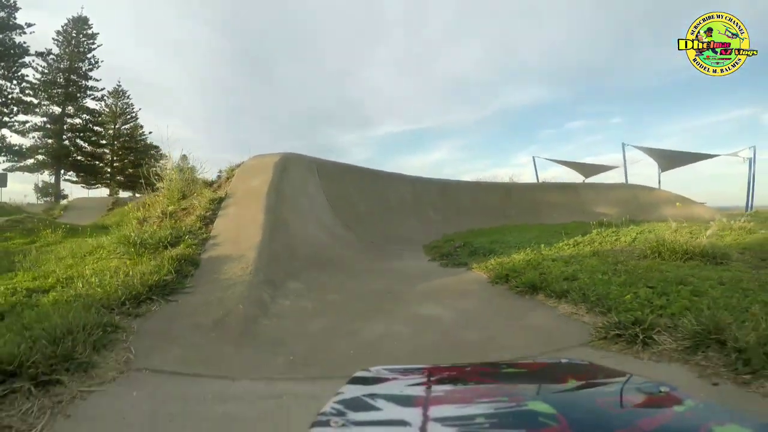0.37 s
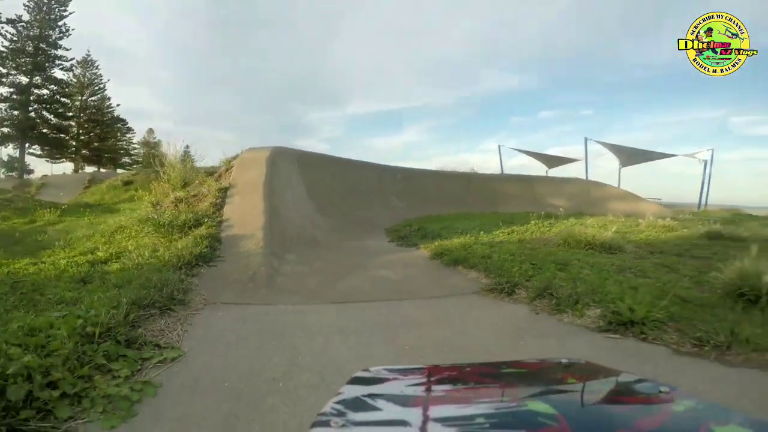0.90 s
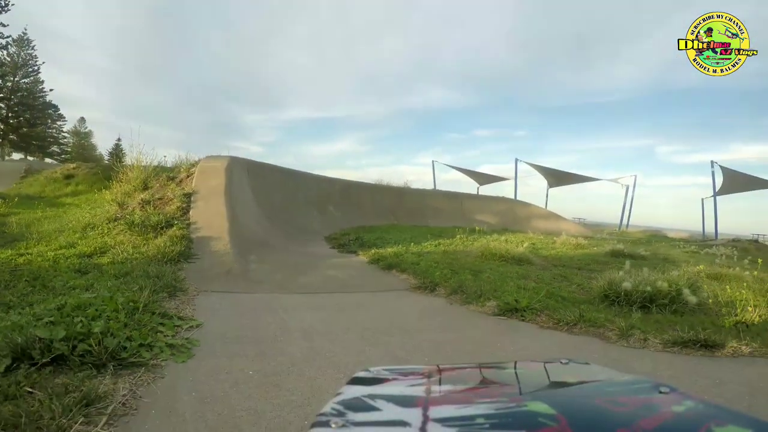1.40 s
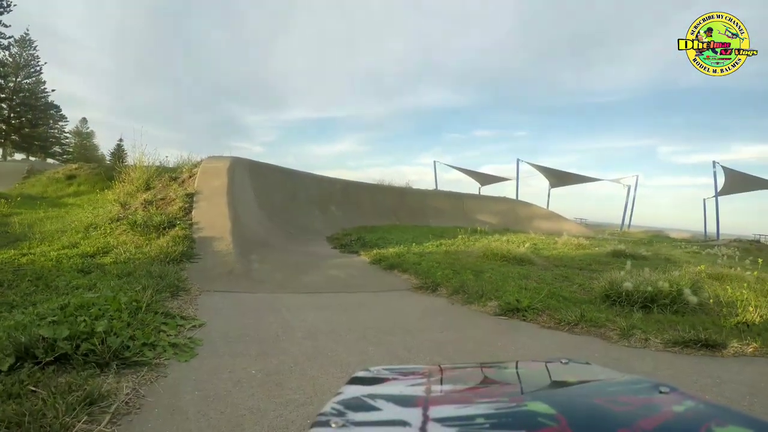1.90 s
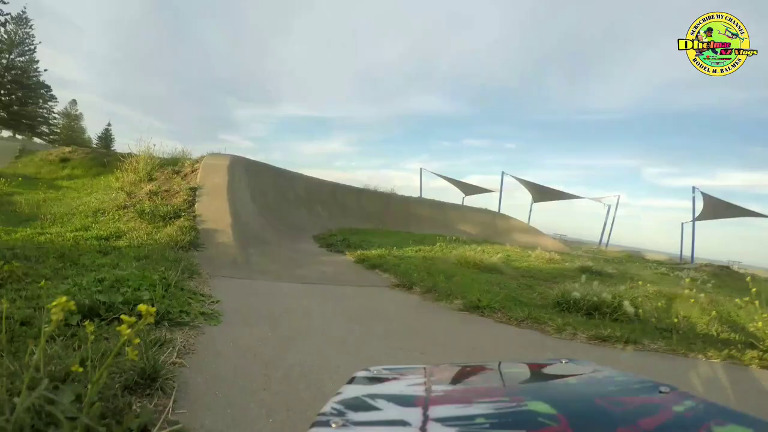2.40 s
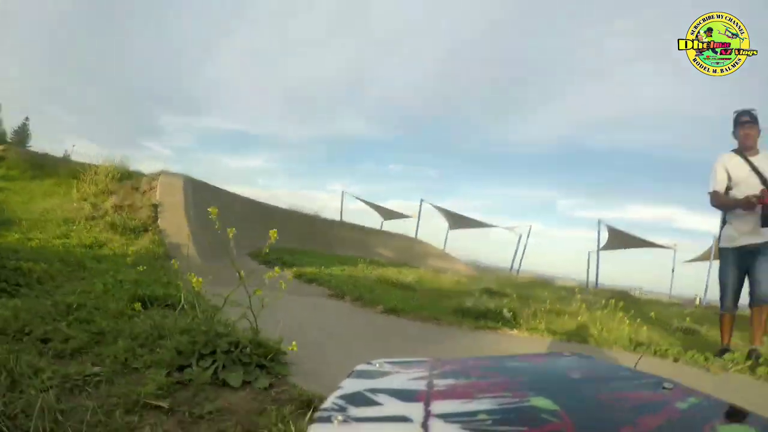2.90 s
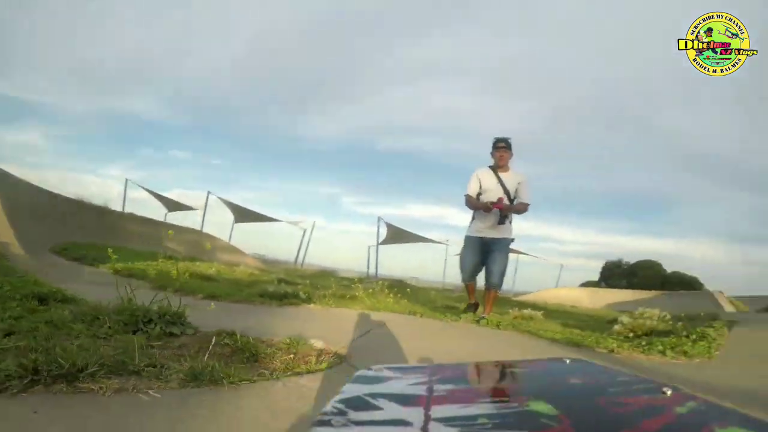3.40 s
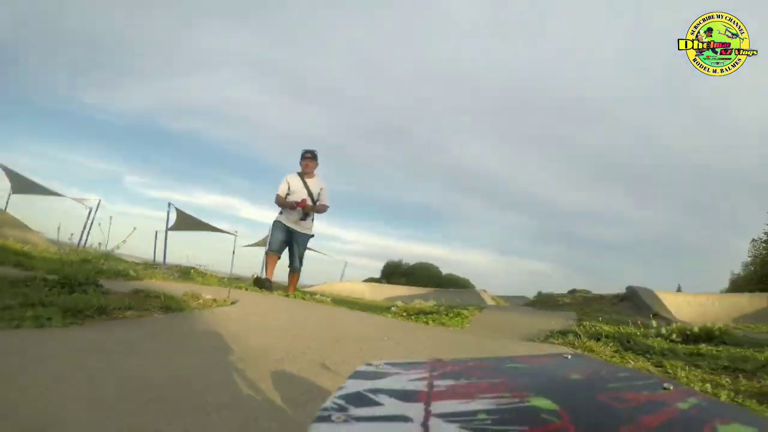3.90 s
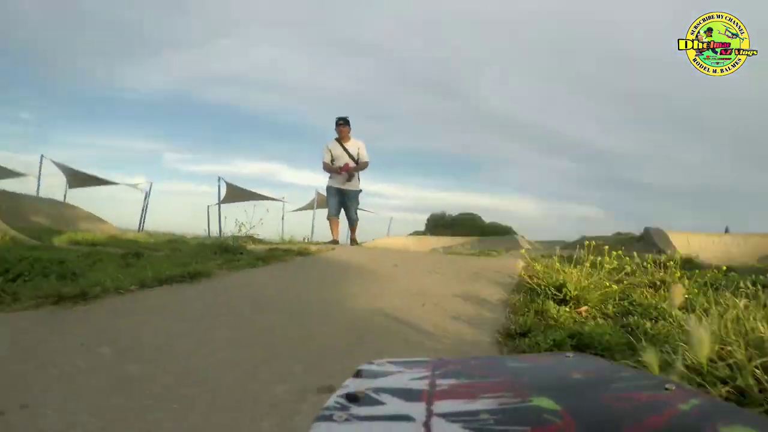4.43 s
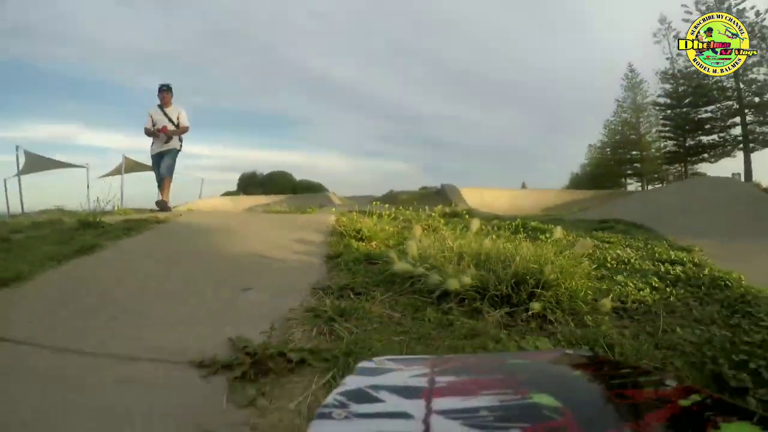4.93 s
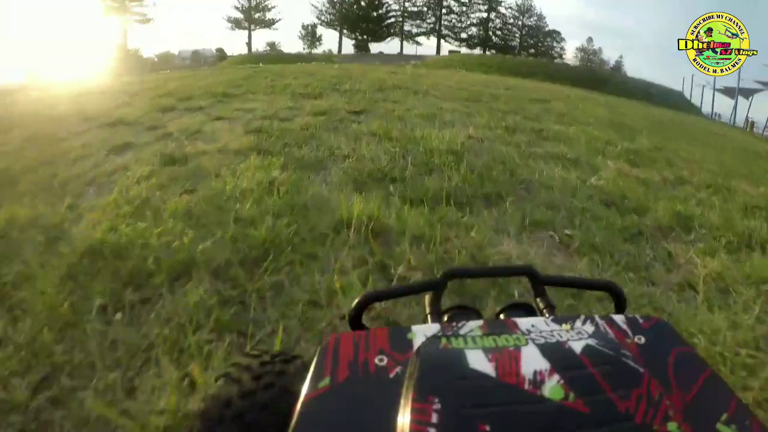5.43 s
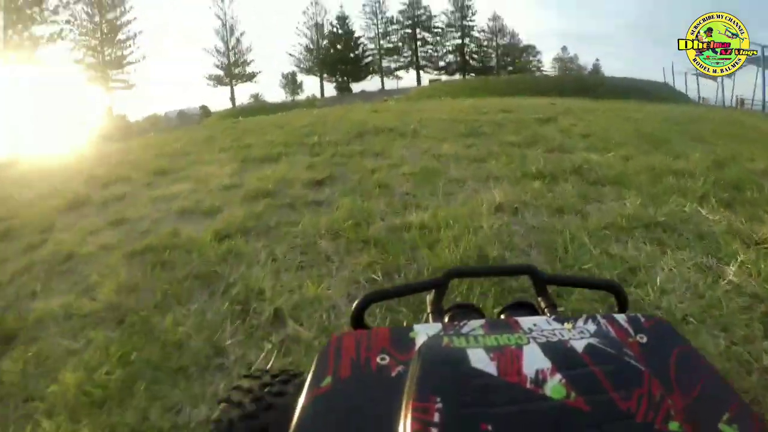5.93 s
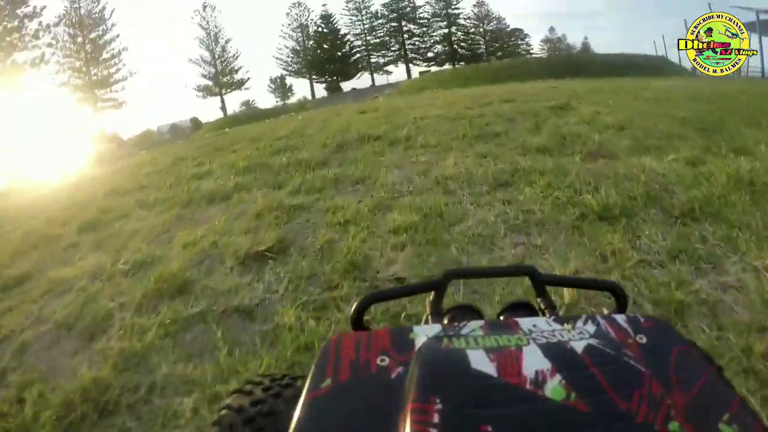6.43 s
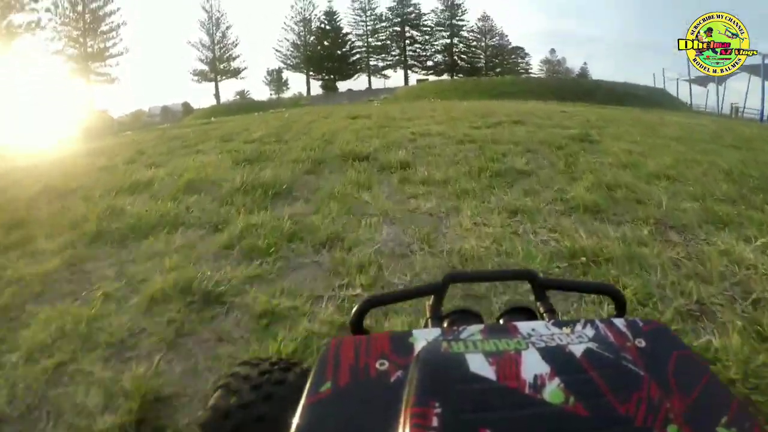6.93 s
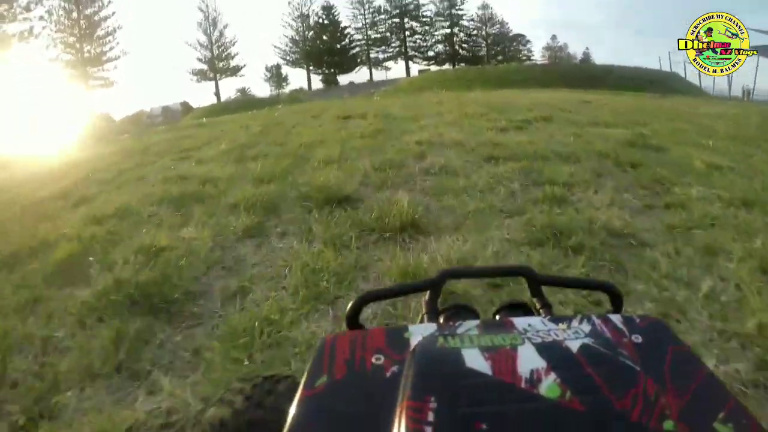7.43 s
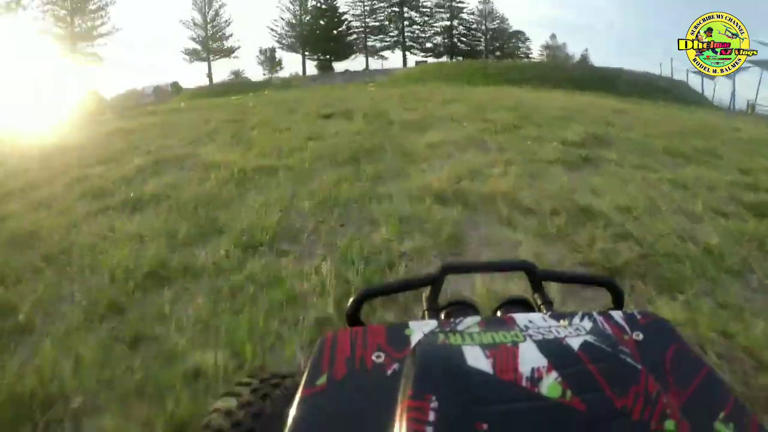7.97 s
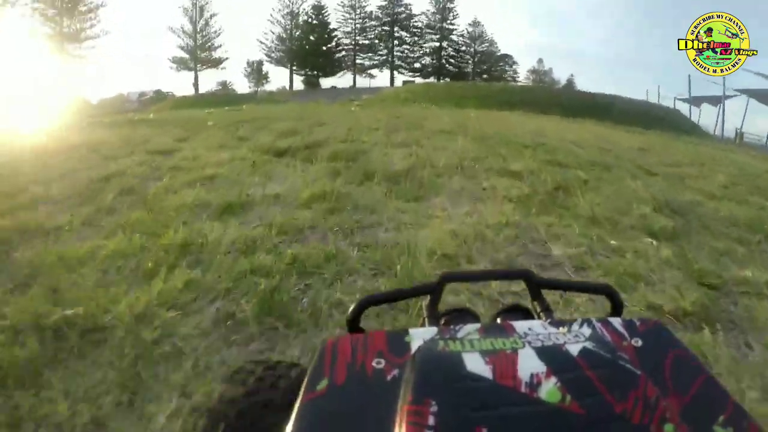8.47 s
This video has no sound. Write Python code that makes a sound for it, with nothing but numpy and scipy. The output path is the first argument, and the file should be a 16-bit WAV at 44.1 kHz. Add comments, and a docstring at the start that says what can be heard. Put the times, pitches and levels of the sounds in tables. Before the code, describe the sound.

Mounted on the body, very close and dry: a small electric drivetrain whirs and buzzes with clattering plastic and fizzing tyres on concrete. Throttle closes, leaving faint hiss and little clicks, then a jolt and a rising gear whine. The run grows rough with sharp cracks, thuds and low bumps. It cuts to grass, where the motor slows unevenly, then speeds up through muffled rumble, light ticking and a cluster of knocks.

```python
"""Toy electric truck on path and lawn

Heard by a small camera fixed to its body: first on a concrete path, where it stops once and pulls away,
then on a lawn in a second mounting. Resonators driven by random jolts give chassis, mount and shell; filtered
noise gives clatter, tyre fizz, panel buzz and grass ticks; phase-modulated sines give the gear whine;
scrapes and blows exciting decaying modes give the knocks of loose parts."""
import sys
import numpy as np
from scipy import signal
from scipy.fft import rfft, irfft, next_fast_len
from scipy.io import wavfile
from scipy.ndimage import uniform_filter1d

SR = 44100
rng = np.random.default_rng(int(sys.argv[2]) if len(sys.argv) > 2 else 0)


def boost_factor(decibels):
    """Convert a level in decibels to a linear amplitude factor."""
    exponent = np.asarray(decibels, float) / 20
    return 10 ** exponent


def output_pcm(signal):
    """Save a mono or channel-first signal as 16-bit PCM at the path in sys.argv[1].

    Samples are clipped to [-1, 1] before scaling.
    """
    pcm = np.clip(np.atleast_2d(signal).T, -1, 1) * 32767
    wavfile.write(sys.argv[1], SR, np.round(pcm).astype(np.int16))


N = 378378
TIME = np.arange(N) / SR
LAWN_S = 5.62
PINION_TEETH = 7
PADDED = next_fast_len(N + 16384)
BIN_HZ = np.maximum(np.arange(PADDED // 2 + 1) * SR / PADDED, 1)

# steady drivetrain, drops as the throttle closes at 1.15 s:
# t/s, body rattle level/dB, gear hiss level/dB, tyre fizz level/dB
DRIVE = [(0, -29, -44, -54), (.25, -31.5, -49, -62), (.42, -32.5, -47.5, -60), (.44, -30, -42.5, -62),
         (.9, -29, -42, -55), (1.14, -30, -39.5, -59), (1.17, -31.5, -49.5, -58),
         (1.36, -39.5, -53.5, -55.5), (1.42, -34.5, -57, -66), (1.55, -45, -66, -66), (1.64, -49, -67, -65),
         (1.7, -54, -69, -68), (2.0, -47.5, -77, -66), (2.1, -39.5, -66, -64), (2.2, -28.5, -52, -70),
         (2.3, -29.5, -49, -53), (2.5, -32.5, -42, -62), (2.75, -28, -38.5, -53), (3.6, -28, -40.5, -56.5),
         (4.0, -26.5, -38, -45), (4.05, -28.5, -42, -55.5), (4.6, -28.5, -38, -56), (5.3, -30, -42, -61),
         (5.62, -30.5, -42.5, -65), (5.76, -33.5, -45.5, -67), (6.7, -37, -50, -67),
         (7.35, -31, -43, -64.5), (8.58, -33, -44.5, -65.5)]
# gear teeth: t/s, mean mesh f/Hz, whine level/dB, overtone level/dB (both re steady body rattle)
MESH = [(0, 696.4, -34, -8), (.38, 737.5, -15, -14), (.48, 809.5, -0.5, -9), (.65, 913, -6.5, -11),
        (.86, 972.4, -6, -12.5), (1.1, 996.5, -4.5, -9), (1.25, 870.5, -10, -33), (2.05, 285.6, -21, -32),
        (2.2, 431.6, -9, -16), (2.36, 690, 0, -14), (2.53, 882, -1, -10), (2.6, 950, 0, -5),
        (2.68, 1020, -4, -9), (2.77, 1083, -9.5, -11), (3, 1096, -13, -18.5), (3.25, 1192, -10, -20),
        (3.38, 1195, -12, -14), (3.6, 1215, -24, -20), (3.95, 1378, -22, -22), (4.75, 1340, -12, -23),
        (4.79, 1325, -12, -6), (4.85, 1140, -13, -15), (4.93, 1055, -9, -8), (5.1, 1090, -1, -24),
        (5.17, 1096, -5, -13), (5.2, 1096, -12, 1), (5.23, 1106, -4, -12), (5.35, 1107, -6, -12.5),
        (5.46, 1063, -3.5, -8), (5.52, 1050, -11, -18), (5.7, 933, -22, -14), (6.1, 697.5, -7, -6),
        (6.18, 690, -8, 1), (6.23, 605, -11, -2), (6.3, 650, -13, -4.5), (6.38, 600, -8, -5),
        (6.43, 675, -14, -6), (6.52, 640, -7, 0), (6.58, 570, -10, -8), (6.75, 621, -4, -1),
        (6.87, 695.6, -1, -0.5), (7, 785, -1, -8), (7.08, 860, -8, -4), (7.17, 880, -10, -6.5),
        (7.23, 910, -10, -5), (7.27, 960, -9, -16), (7.35, 1023, -6.5, -17), (7.75, 1115, -7.5, -17),
        (7.88, 1134, -19, -20), (8, 1184, -9, -10), (8.25, 1079, -14, -27), (8.4, 1108, -11, -1.5),
        (8.58, 1094, -4, -31)]


def level(x):
    """Scale to rms 1."""
    return x / np.sqrt(np.mean(x ** 2))


def curves(table):
    """Columns of a table as one value per sample."""
    t_s, *columns = np.transpose(table)
    return [np.interp(TIME, t_s, column) for column in columns]


def walk(rate_hz):
    """Random steps held 1 / rate_hz and smoothed twice; rms 1."""
    hold = int(SR / rate_hz)
    steps = np.repeat(rng.standard_normal(N // hold + 1), hold)
    return level(uniform_filter1d(uniform_filter1d(steps, hold), hold)[:N])


def band(x, lo_hz, hi_hz):
    """Steep band-pass."""
    return signal.sosfilt(signal.butter(3, [lo_hz, hi_hz], "band", fs=SR, output="sos"), x)


def below(x, hz):
    """Steep low-pass without delay, so that neighbouring ranges add up flat."""
    return irfft(rfft(x, PADDED) / (1 + (BIN_HZ / hz) ** 12), PADDED)[:N]


def resonate(x, modes):
    """Sum of resonances, neighbours in opposite sign."""
    out = 0
    for k, (hz, width_hz, db) in enumerate(modes):
        out = out + (-1) ** k * boost_factor(db) * signal.lfilter(*signal.iirpeak(hz, hz / width_hz, SR), x)
    return out


def colour(x, spectrum, peaks):
    """Shape by a spectrum with resonances on top."""
    hz, db = np.transpose(spectrum)
    gain_db = np.interp(np.log(BIN_HZ), np.log(hz), db)
    for peak_hz, width_hz, rise_db in peaks:
        gain_db = gain_db + rise_db / (1 + (2 * (BIN_HZ - peak_hz) / width_hz) ** 2)
    return irfft(rfft(x, PADDED) * boost_factor(gain_db), PADDED)[:N]


def grit(per_s, spread_db):
    """Random small impacts of uneven strength; rms 1."""
    hit = rng.random(N) < per_s / SR
    strength = boost_factor(spread_db * np.minimum(rng.exponential(size=N), 3))
    return level(hit * rng.standard_normal(N) * strength)


def spells(rows, rise_s, fall_s, column=2, sag_db_per_s=0):
    """Gain of events that swell, hold (sagging if asked) and die away."""
    out = np.zeros(N)
    for row in rows:
        start_s, length_s = row[:2]
        since_s = TIME - start_s
        shape = np.exp(np.minimum(0, np.minimum(since_s / rise_s, (length_s - since_s) / fall_s)))
        sag_db = sag_db_per_s * (np.clip(since_s, 0, length_s) - length_s / 2)
        out = np.maximum(out, shape * boost_factor(row[column] - sag_db))
    return out


def shaking():
    """Tyre lugs and bumps jolt the chassis; the camera mount rings on one note and the shell booms."""
    # shaking between bumps: t/s, chassis rumble level/dB, mount hum level/dB, shell boom level/dB
    shake = [(0, -25, -22.5, -35.5), (.4, -22.5, -28.5, -21.5), (.75, -22, -24.5, -22),
             (1.15, -28, -20, -25.5), (1.3, -29, -25.5, -32), (1.45, -31.5, -35, -31),
             (1.68, -34.5, -46, -44.5), (2.0, -30, -48, -42), (2.04, -23.5, -20.5, -22),
             (2.2, -28.5, -35, -29), (2.6, -24, -25, -25.5), (3.0, -14.5, -27, -23), (3.6, -22, -27.5, -24),
             (4.0, -14.5, -34, -22), (4.45, -19, -29, -27), (5.0, -14, -35, -23.5),
             (5.55, -17.5, -24.5, -25.5), (5.7, -20, -28, -32.5), (6.5, -22.5, -23, -30),
             (7.2, -21, -29, -26), (7.9, -16, -29, -27), (8.58, -21.5, -27.5, -24.5)]
    # chassis resonances on each ground: f/Hz, width/Hz, level/dB
    chassis_path = [(13.8, 22.4, 0), (28.6, 17.1, 5), (58, 33.6, -2), (80.3, 20.9, 0), (147.9, 34.7, -6.5)]
    chassis_lawn = [(14, 19.7, 0.5), (34.4, 20.4, 1.5), (64, 38.8, 2), (87.2, 45.6, 1), (155, 39.5, -7)]
    # shell resonances: f/Hz, width/Hz, level/dB
    shell = [(181.2, 29, -9.5), (241.6, 23.8, 2.5), (271.5, 26, 3), (341.4, 66, -7.5)]
    # bumps under the wheels: start t/s, length/s, rumble level/dB
    bumps = [(2.431, 0.038, -14), (2.666, 0.031, -14), (2.818, 0.047, -11), (3.037, 0.087, -14),
             (3.095, 0.065, -32), (3.4, 0.046, -16), (3.514, 0.038, -14), (3.634, 0.036, -16),
             (3.754, 0.061, -9), (3.835, 0.055, -7.5), (3.914, 0.07, -18), (4.047, 0.063, -19),
             (4.304, 0.041, -23), (4.348, 0.078, -12.5), (4.508, 0.049, -12.5), (4.564, 0.1, -10),
             (4.7, 0.034, -7.5), (4.865, 0.099, -13.5), (4.999, 0.033, -17), (5.043, 0.031, -18),
             (5.137, 0.05, -11), (5.186, 0.035, -17), (5.246, 0.089, -7), (5.376, 0.034, -14),
             (5.412, 0.032, -15), (5.448, 0.03, -10), (5.98, 0.058, -12), (6.099, 0.029, -14.5),
             (6.214, 0.038, -23), (6.421, 0.034, -18), (7.093, 0.047, -19), (7.26, 0.073, -14.5),
             (7.347, 0.031, -22), (7.393, 0.033, -26), (7.427, 0.041, -9.5), (7.521, 0.029, -25),
             (7.589, 0.033, -19), (7.726, 0.052, -13.5), (7.808, 0.028, -22), (7.84, 0.022, -12),
             (8.045, 0.049, -16.5)]
    # spells in which the mount rings: start t/s, length/s, mid-spell level/dB, f/Hz
    rings = [(0.002, 0.025, -15, 114.6), (0.813, 0.046, -14.5, 113.9), (0.871, 0.073, -18, 114),
             (0.965, 0.07, -12.5, 114.7), (1.039, 0.11, -17, 115.4), (1.19, 0.09, -19, 116.4),
             (2.456, 0.014, -18, 116.6), (2.764, 0.094, -21, 120), (2.91, 0.066, -19, 116.9),
             (3.045, 0.045, -17, 115.9), (3.15, 0.09, -15.5, 115.9), (3.384, 0.029, -18, 105.3),
             (3.49, 0.079, -21.5, 118.6), (3.667, 0.12, -18, 116), (3.758, 0.051, -18, 115),
             (3.81, 0.08, -29, 111.4), (3.926, 0.18, -18, 113.5), (4.171, 0.033, -20, 113.4),
             (4.282, 0.082, -24, 119), (4.35, 0.08, -19, 117.5), (4.588, 0.043, -16.5, 117.7),
             (4.734, 0.084, -18.5, 123.8), (4.851, 0.057, -33, 122.4), (4.921, 0.11, -18.5, 111.7),
             (5.142, 0.15, -16, 119.5), (5.286, 0.063, -18, 125.2), (5.343, 0.1, -18.5, 122.6),
             (5.447, 0.14, -18.5, 115.9), (6.012, 0.086, -27, 105.7), (6.703, 0.07, -18.5, 118.5),
             (7.102, 0.058, -19.5, 111.6), (7.973, 0.046, -19.5, 106), (8.31, 0.095, -21.5, 114),
             (8.537, 0.04, -22, 114.4)]
    # booms of the shell: start t/s, length/s, level/dB
    booms = [(0.52, 0.031, -21), (0.772, 0.02, -22), (0.88, 0.041, -15), (1.735, 0.048, -32),
             (1.815, 0.027, -27.5), (2.432, 0.052, -15.5), (2.659, 0.049, -13), (2.754, 0.041, -13),
             (2.779, 0.032, -16), (2.95, 0.06, -18.5), (3.286, 0.021, -14), (3.353, 0.046, -16),
             (3.821, 0.14, -14), (3.961, 0.055, -20), (4.004, 0.087, -11), (4.2, 0.049, -20.5),
             (4.508, 0.051, -18.5), (4.727, 0.043, -16), (4.773, 0.038, -29), (4.802, 0.052, -22),
             (4.878, 0.06, -21.5), (4.994, 0.047, -17), (5.083, 0.038, -15), (5.117, 0.044, -13.5),
             (5.157, 0.032, -21), (5.242, 0.067, -17.5), (5.287, 0.035, -30), (5.332, 0.12, -12),
             (5.521, 0.036, -21), (7.732, 0.033, -18.5), (8.112, 0.029, -21.5)]

    rumble_db, hum_db, boom_db = curves(shake)
    jolts = band(grit(per_s=900, spread_db=3.0), 2.4, 497)
    lawn = np.clip((TIME - LAWN_S) / .02, 0, 1)
    rumble = lawn * level(resonate(jolts, chassis_lawn)) + (1 - lawn) * level(resonate(jolts, chassis_path))

    # low down the chassis sways on its springs and bumps hardly reach it
    sway = below(rumble, 45.8)
    bump_gain = spells(bumps, rise_s=.012, fall_s=0.0058)
    rumble = (rumble - sway) * np.hypot(boost_factor(rumble_db + 0.9 * walk(11)), bump_gain)
    sway_path_db, sway_lawn_db, sway_share = -7, -6, 0.72
    sway_db = sway_share * rumble_db + sway_path_db + lawn * (sway_lawn_db - sway_path_db)
    rumble = rumble + sway * boost_factor(sway_db)

    mount = [(115.9, 10.8, 0)]  # f/Hz, width/Hz, level/dB
    hum = level(resonate(resonate(jolts, mount), mount)) * boost_factor(hum_db)
    start_s, length_s, _, hz = np.transpose(rings)
    ring_hz = np.interp(TIME, start_s + length_s / 2, hz) * (1 + 0.0155 * walk(30))
    swing = spells(rings, rise_s=0.014, fall_s=0.013, sag_db_per_s=18)
    ring = np.sqrt(2) * np.sin(2 * np.pi * np.cumsum(ring_hz) / SR)
    ring = ring * swing * boost_factor(3.2 * walk(35))
    hum = hum / (1 + (swing / boost_factor(hum_db)) ** 2)  # a wide swing takes over from the random hum

    boom = level(band(resonate(jolts, shell), 118.0, 468))
    boom_gain = spells(booms, rise_s=0.0039, fall_s=0.016)
    boom = boom * np.hypot(boost_factor(boom_db + 1.5 * walk(20)), boom_gain)
    return rumble + hum + ring + boom


def tooth_phase():
    """Gear mesh phase in radians; the speed wavers with the ground."""
    waver = 1 + .009 * walk(9) + .014 * walk(25) + .014 * walk(200)
    return 2 * np.pi * np.cumsum(curves(MESH)[0] * waver) / SR


def drive_gains():
    """Gains of body rattle, gear hiss and upper hiss: the steady drive plus bursts."""
    # bursts as the body is thrown about: start t/s, length/s, body rattle level/dB, gear hiss level/dB
    rattles = [(.78, 0.083, -44, -46), (1.3, 0.016, -31, -61), (1.73, 0.025, -44, -74),
               (2.02, 0.057, -31.5, -58), (2.29, 0.048, -49, -48), (2.62, 0.072, -29.5, -42),
               (2.955, 0.036, -34, -54), (3.045, 0.026, -26, -47), (4.52, 0.019, -17.5, -33),
               (4.57, 0.033, -43, -44), (5.08, 0.055, -27.5, -60), (5.015, 0.021, -36, -41),
               (5.27, .02, -34, -48), (7.425, 0.065, -32, -46), (7.72, 0.054, -34, -48)]
    rise_s, fall_s = 0.0022, 0.0014
    rattle_db, gear_db, _ = curves(DRIVE)
    rattle = np.hypot(boost_factor(rattle_db), spells(rattles, rise_s, fall_s))
    gear = np.hypot(boost_factor(gear_db), spells(rattles, rise_s, fall_s, column=3))
    upper_db = np.where(TIME > LAWN_S, -8, -12)  # re gear hiss
    return rattle, gear, gear * boost_factor(upper_db)


def clatter(phase):
    """Uneven tooth contacts and body rattle, flickering in level, through the body of each mounting."""
    # body to microphone in each mounting: f/Hz, level/dB (per Hz)
    body_path = [(190, -20), (330, -0.5), (374, -12.5), (412, -2.5), (650, -15), (957, -16.5), (1100, -18),
                 (1510, -18.5), (1940, -21.5), (2400, -32.5), (2980, -41), (4450, -34.5), (4970, -42.5),
                 (6030, -41), (9000, -47.5), (11700, -76.5), (19800, -120)]
    body_lawn = [(190, -41), (330, -5.5), (395, -3.5), (696, -11.5), (757, -18.5), (1070, -16.5),
                 (1370, -14), (1490, -18), (2390, -26.5), (3470, -28), (4510, -26), (5470, -34),
                 (6820, -36.5), (9000, -50.5), (11700, -81.5), (19800, -120)]
    # housing resonances in each mounting: f/Hz, width/Hz, rise level/dB
    housing_path = [(750, 150, 5.5), (1260, 160, 4.5), (3770, 2350, 3), (4350, 440, -1), (4690, 230, 1),
                    (6040, 300, 1), (8600, 600, 8.5), (6920, 420, 4)]
    housing_lawn = [(3100, 540, 1.5), (4020, 340, 6), (4520, 600, 6), (6700, 340, 5.5)]

    # the pinion bites harder once a turn
    flicker = boost_factor(.8 * walk(20) + 1.5 * walk(50) + 1.5 * np.sin(phase / PINION_TEETH))
    # every tooth contact is a small puff of noise
    flicker = flicker * (1 + .6 * np.sin(phase))
    source = flicker * (rng.standard_normal(N) + .5 * grit(per_s=830, spread_db=1.5))
    lawn = TIME > LAWN_S
    body = colour(source * lawn, body_lawn, housing_lawn) + colour(source * ~lawn, body_path, housing_path)

    # three ranges: body rattle, gear hiss, upper hiss
    lows = [0] + [below(body, hz) for hz in (2650, 5100, 8000)]
    out = 0
    for under, upto, gain in zip(lows, lows[1:], drive_gains()):
        part = upto - under
        # even out the mountings so that the gains set the loudness
        spread = [np.std(part[~lawn]), np.std(part[lawn])]
        part = part / np.interp(TIME - LAWN_S, [-.01, .01], spread)
        out = out + part * gain * boost_factor(0.25 * walk(30))
    return out


def whine(phase):
    """Mesh tone and its overtones; pinion run-out adds side tones one shaft turn apart, slack smears them."""
    _, first_db, octave_db = curves(MESH)
    load = boost_factor(curves(DRIVE)[0])
    shaft = phase / PINION_TEETH
    runout = .7 * np.sin(shaft) + .3 * np.sin(2 * shaft + 1)
    # the teeth lose and regain contact, so each partial comes in short patches
    slack_db = [2.5 * walk(110) + np.minimum(4 * walk(40), 2.5) for _ in range(4)]
    slack = boost_factor(np.array(slack_db) - 1.5)
    slack[0] *= 1 - .5 * np.cos(shaft)  # uneven load favours the lower side tone
    first = np.sin(phase + runout) * slack[0]
    octave = np.sin(2 * phase + 1.35 * runout) * slack[1]
    third = np.sin(3 * phase + 0.93 * runout) * slack[2] * boost_factor(-11)
    fourth = np.sin(4 * phase + 2 * runout) * slack[3] * boost_factor(-13)
    return load * (first * boost_factor(first_db) + (octave + third + fourth) * boost_factor(octave_db))


def tyre_fizz():
    """Fine grit under the tyres, smooth and high: coloured noise."""
    # f/Hz, level/dB (per Hz)
    fizz_spectrum = [(6500, -6), (8200, -3), (10000, -6.5), (12000, -30), (14500, -35), (16500, -82)]
    fizz_db = curves(DRIVE)[2] + 2.4 * walk(33) + 1.1 * walk(12)
    return level(colour(rng.standard_normal(N), fizz_spectrum, [])) * boost_factor(fizz_db)


def knocks():
    """Loose parts: a brief rough scrape builds to a blow and rings short plastic modes, top dulled by the body."""
    # t/s, peak level/dB before dulling, crack modes level/dB, two lowest modes level/dB (both added to modes)
    blows = [(0.109, -13, -2, -15), (0.402, -18, 1, -7), (0.46, -12.5, -8, 1), (0.738, -18.5, -10, -10),
             (1.125, -16, -6, -5), (1.252, -23, 13, -3), (1.312, -29, 15, -3), (1.437, -25, 23, -6),
             (1.729, -38, 1, -2), (1.796, -19, -3, 3), (1.922, -36, -5, -7), (2.019, -30, -12, 26),
             (2.03, -25, 6, 14), (2.038, -31, -10, -5), (2.046, -32, 4, -3), (2.054, -23, 21, -8),
             (2.066, -16.5, 4, 11), (2.113, -13, -24, 1), (2.407, -11.5, 3, -14), (2.62, -16, 7, -5),
             (2.801, -8, 8.5, 2), (2.817, -7.5, 2, -13), (2.951, 2.5, 6, 0), (3.037, 0.5, 9.5, 1),
             (3.113, -1.5, 11, -9), (4.314, 5, 9, 7.5), (4.351, -6.5, 8.5, 9), (4.444, -1, 12.5, 8.5),
             (4.499, -24, 12, 0), (4.511, 3, 11, 2), (4.569, -12.5, -2, -6), (4.654, -1.5, 12.5, -4),
             (4.787, -14, -6, 20), (5.012, 2, 8, -0.5), (5.039, -8, 12, 11), (5.114, -7, -22, 25),
             (5.196, -15, -13, 1), (5.264, -2.5, 9.5, 5), (5.524, -7.5, 4, 0), (5.647, -6, 2, -19),
             (5.678, -13, -14, 5), (5.703, -18, -9, -17), (5.767, -14.5, -15, 10), (5.817, -18, -8, -15),
             (5.947, -21, -6, -8), (5.979, -13, -17, 13), (6.295, -35, 3, -12), (6.442, -24, -3, -8),
             (6.457, -13, -8, -1), (6.51, -23, -3, -5), (6.61, -31, -1, -12), (6.711, -19, 6, -15),
             (7.422, -2.5, 9, 6), (7.457, -5, -2, 12), (7.479, -8.5, -12, -2), (7.711, -8, -38, 5),
             (7.74, -5, -8, -1), (7.812, -19, -7, -7), (7.888, -12.5, -18, -1), (7.85, -17, -14, 2),
             (7.92, -5, -8, -9), (7.956, -9, -15, -14), (7.989, -8, -23, 4), (8.046, -4.5, 0.5, -3),
             (8.084, -17, 0, -4), (8.134, -16, -6, -7), (8.323, -6.5, -2, -11), (8.445, -13.5, 3, 15),
             (8.468, -9, -9, -3)]
    # plastic modes: f/Hz, level/dB, t60/s
    thud_modes = [(395, -8, 0.017), (696, 4.5, 0.0068), (1050, -2, 0.006), (1337, -1, 0.0079),
                  (1720, -6.5, 0.0096)]
    crack_modes = [(3100, -21, .004), (3700, -8, .006), (4450, -10, .009), (5700, -10, .007),
                   (6800, -19, .004), (8000, -14, .004)]

    out, t_s = np.zeros(N + 4000), np.arange(1500) / SR
    chance = rng.standard_normal((len(blows), 2, len(thud_modes) + len(crack_modes)))
    lead_s, fade_s = .0024, .0013
    since_s = np.arange(500) / SR - .005
    swell = np.exp(np.minimum(since_s / lead_s, -since_s / fade_s))
    rough = rng.standard_normal((len(blows), len(since_s))) * swell
    for (blow_s, db, crack_db, low_db), (tune, size), scrape in zip(blows, chance, rough):
        modes = np.array(thud_modes + [(f, d + crack_db, t60) for f, d, t60 in crack_modes])
        hz = modes[:, 0] * (1 + .02 * tune)
        gain = boost_factor(modes[:, 1] + 1.5 * size)
        gain[:2] *= boost_factor(low_db)  # a softer contact puts more into the lowest modes
        ring = gain @ (np.sin(2 * np.pi * hz[:, None] * t_s) * 1000. ** (-t_s / modes[:, 2:]))
        # dull knocks are softer, longer contacts
        contact_s = .00004 * boost_factor(np.clip(-crack_db / 2, 0, 8))
        push = .035 * scrape + np.exp(-(since_s / contact_s) ** 2) * .000007 / contact_s
        sound = np.convolve(ring, push)
        # the crack itself is broad noise
        sound[:len(scrape)] += boost_factor(crack_db - 15.0) * np.diff(scrape, prepend=0)
        sound = sound / np.abs(sound).max()
        i = int((blow_s + since_s[0] + 0.00074) * SR)
        out[i:i + len(sound)] += boost_factor(db) * sound
    return below(below(out[:N], 7870), 8900)


def buzzes():
    """A loose panel buzzes on single high notes: narrow, fluttering noise."""
    # start t/s, length/s, level/dB, f/Hz
    buzz_rows = [(.78, 0.11, -48, 5300), (0.787, 0.085, -46, 6050), (.95, .2, -55, 6330),
                 (.45, 0.67, -60, 7100), (1.181, .05, -51, 5300), (1.183, .06, -54, 6000),
                 (2.3, 0.038, -52, 5400), (2.415, 0.28, -55, 4690), (2.79, 0.022, -45, 4200),
                 (2.98, 0.062, -54, 4750), (4.331, 0.073, -52, 4750), (4.41, 0.051, -48, 4830),
                 (4.53, 0.073, -45, 5730), (4.523, 0.073, -55, 8600), (5.02, .13, -56, 5793),
                 (5.19, 0.092, -48.5, 4810)]
    width_hz, edge_s = 290, 0.013
    out, noise = 0, rng.standard_normal(N) * boost_factor(4.0 * walk(60))
    for row in buzz_rows:
        hz = row[3]
        note = level(band(noise, hz - width_hz / 2, hz + width_hz / 2))
        out = out + note * spells([row], edge_s, edge_s)
    return out


def stalks():
    """Sparse ticks of grass stalks on the underside, each a few milliseconds of decaying noise."""
    tail = np.exp(-np.arange(300) / SR / 0.0029)
    envelope = np.convolve(np.abs(grit(per_s=49, spread_db=-2.0)), tail)[:N]
    ticks = envelope * rng.standard_normal(N)
    return level(band(ticks, 2200, 4500)) * boost_factor(-54) * (TIME > LAWN_S)


def scene():
    """Sum of all sources at the one microphone; clatter and whine share the gear phase."""
    phase = tooth_phase()
    gears = clatter(phase) + whine(phase)
    mix = shaking() + gears + tyre_fizz() + knocks() + buzzes() + stalks()
    return mix[None]


def roll_off(x):
    """The treble ends steeply here."""
    return signal.sosfilt(signal.butter(12, 15100, fs=SR, output="sos"), x)


def record(dry):
    """The camera rounds the loudest peaks, dulls the very top and adds a faint hiss."""
    # f/Hz, level/dB (per Hz)
    hiss_spectrum = [(1500, -2), (3500, -1.5), (9000, -13.5), (12000, -8), (15000, -45), (17000, -59)]
    hiss_db = -63 - 9 * (TIME > LAWN_S)  # less hiss in the second mounting
    hiss = level(colour(rng.standard_normal(N), hiss_spectrum, [])) * boost_factor(hiss_db)
    rounded = np.tanh(1.05 * dry[0]) / 1.05
    return roll_off(below(rounded, 14000)[None] + hiss)


dry = scene()
out = record(dry)
output_pcm(out)
```